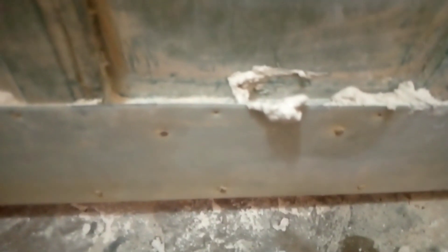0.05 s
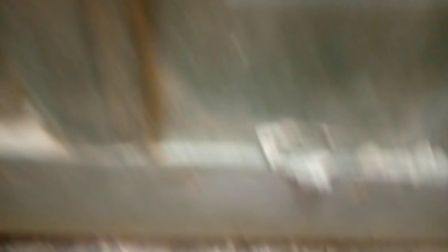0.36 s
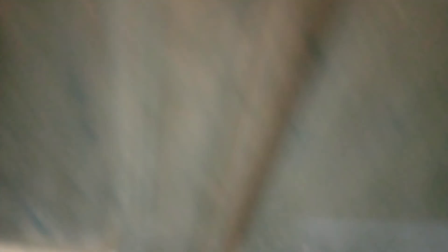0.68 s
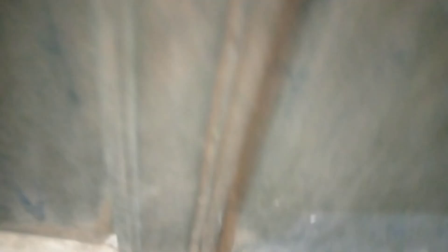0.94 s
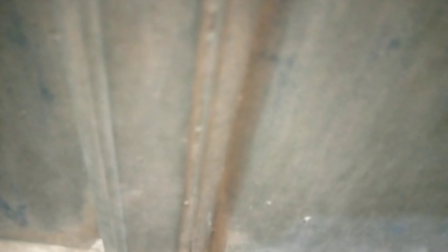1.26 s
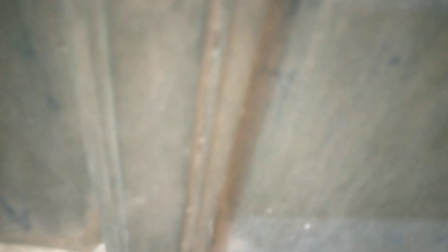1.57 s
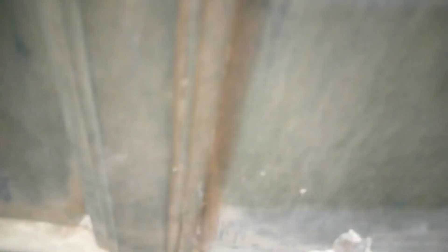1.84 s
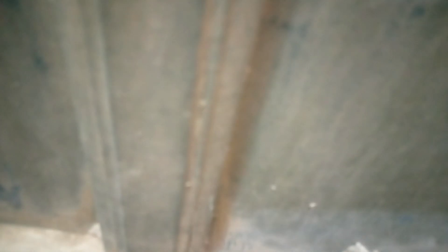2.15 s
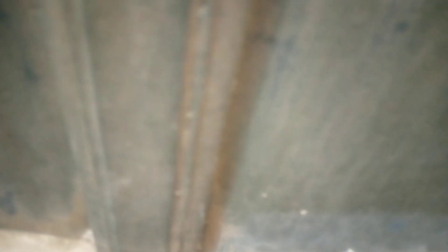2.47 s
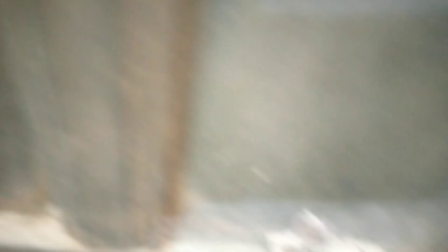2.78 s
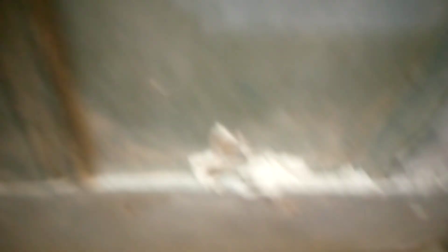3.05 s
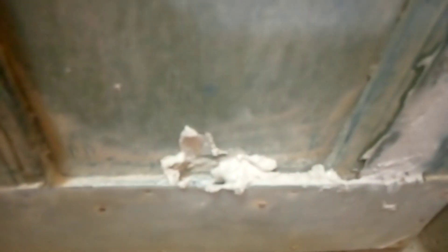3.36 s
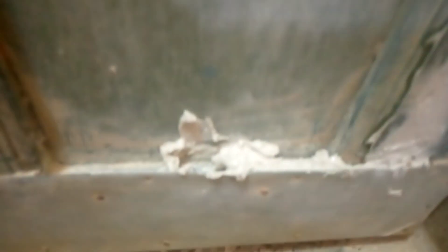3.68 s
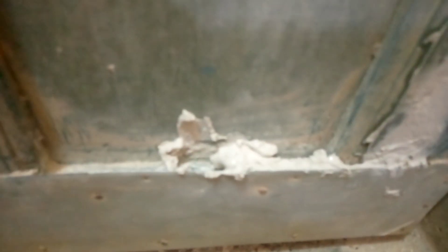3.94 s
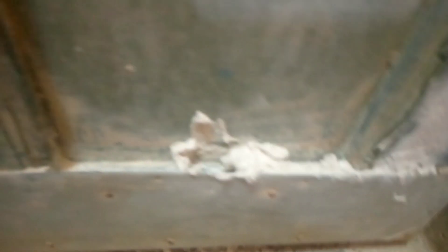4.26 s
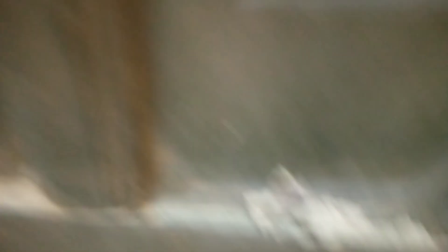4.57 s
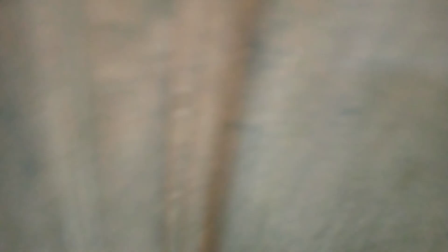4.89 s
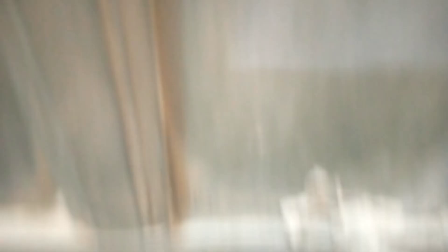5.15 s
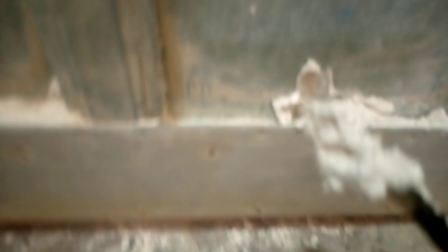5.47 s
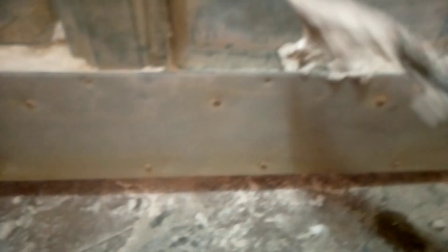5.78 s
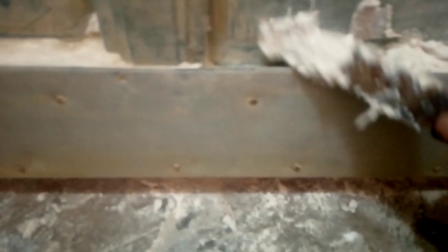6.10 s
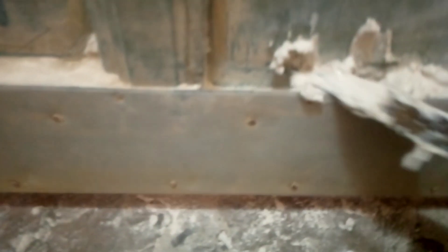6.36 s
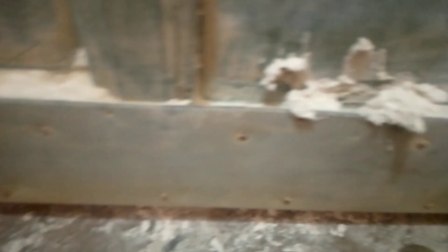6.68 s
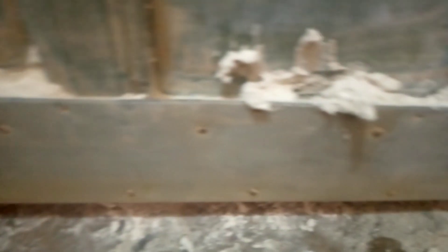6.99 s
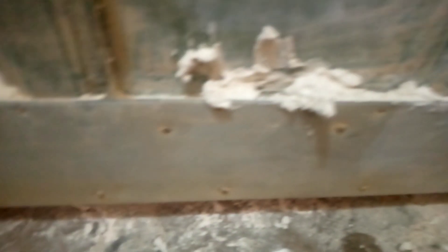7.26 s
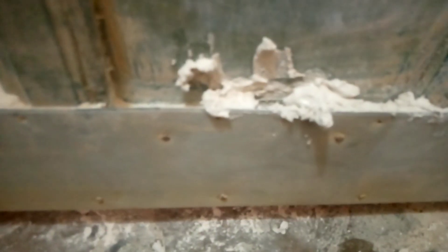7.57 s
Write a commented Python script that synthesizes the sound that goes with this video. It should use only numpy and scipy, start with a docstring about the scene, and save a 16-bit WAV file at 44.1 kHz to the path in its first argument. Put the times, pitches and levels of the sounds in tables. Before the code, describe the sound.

A putty knife knocks dully in a tub of crackling wet filler, then taps and scrapes it along a wooden door.

```python
"""A putty knife scoops wet filler from a tub and spreads it into the gap under a wooden door.
In the tub the blade knocks and scrapes dully while the paste tears and its air pockets crackle.
On the door it lands with a tap, then drags with a gritty hiss that swells until it lifts off;
the steel edge rasps and the panel booms. A bare room rings around it all, over a quiet hiss."""
import sys
import numpy as np
from scipy import signal
from scipy.fft import rfft, irfft
from scipy.io import wavfile
from scipy.ndimage import uniform_filter1d, map_coordinates

SR = 44100
rng = np.random.default_rng(int(sys.argv[2]) if len(sys.argv) > 2 else 0)


def persist_wave(psi):
    """Save psi, clipped to +-1, as 16-bit WAV."""
    counts = np.round(np.clip(psi, -1, 1) * 32767).astype(np.int16)
    wavfile.write(sys.argv[1], SR, np.atleast_2d(counts).T)


N = 336483
TIME = np.arange(N) / SR

# Levels in all tables are relative; each layer adds its own gain.
# pushes along the door: start_s, length_s, final_grit_db, swell_db, drag_db, boom_db
STROKES = [(1.223, 0.14, -82, -34.5, -63, -42), (1.389, 0.12, -51.5, 6, -45, -37.5),
           (1.478, 0.19, -51, -7, -46, -49.5), (2.034, 0.096, -40.5, 17.5, -74, -67),
           (2.464, 0.12, -66, -7.5, -53, -44), (2.588, 0.1, -30.5, 20, -46.5, -41.5),
           (6.145, 0.298, -59.5, -2.5, -59, -56.5), (6.422, 0.11, -44, 22.5, -40, -43),
           (6.525, 0.063, -34.5, 7.5, -47, -52), (6.63, 0.19, -87, -14, -55, -57)]
# hollow resonances of the tub: pitch_hz, width_hz, level_db
TUB_MODES = [(494, 36, -8), (847, 25.3, -7.5), (1085, 25, -9), (1189, 42, -5), (1434, 81, -0.5),
             (1510, 20, -8), (1836, 20, -6.5)]
# first reflections, at the tub and for paste and door: delay_ms, level_db
TUB_ECHOES = [(3.2, -6), (11.5, -10)]
NEAR_ECHOES = [(1.452, -17), (4.302, -16)]
# tone curves of crackling paste and of grit under steel: frequency_hz, level_db
CRACKLE_TONE = [(500, -15.5), (2800, -5), (4500, 2.5), (6500, 4.5), (10000, -4), (15000, -6.5)]
GRIT_TONE = [(200, -24), (600, 2), (950, 2.5), (1200, 3), (1500, 2.5), (2000, 1.5), (2600, 2.5),
             (3200, -1.5), (4400, 0), (5500, 3.5), (6700, 6.5), (9000, -4), (15000, -6.5)]


def tub_knocks(level_db, click_db, hardening_per_db, bass_hz):
    """Paste cushions each knock to a dull pulse, shorter and higher when hard; the steel adds a click."""
    # blade hits on the tub: start_s, peak_db, click_re_peak_db, bass_db
    hits = [(0.2157, -43, -23, 1), (0.2405, -29, -32, -1.5), (0.3836, -27, -39, -6.5),
            (0.3949, -16, -28, -8), (0.531, -8, -30, -6.5), (3.266, -39, -34, -2.5),
            (3.403, -40.5, -30, -0.5), (3.7908, -25.5, -30, -4.5), (4.057, -31.5, -36, -0.5),
            (4.4485, -17, -35, -3), (7.46, -39.5, -28, -24), (7.596, -35, -34, -21)]
    # tone curves of the cushioned knock and the steel click: frequency_hz, level_db
    knock_tone = [(50, -43.5), (100, -14.5), (180, -13), (280, -11), (480, 1), (780, -1), (1500, -2),
                  (2000, -14), (2800, -30.5), (3800, -57), (15000, -54.5)]
    click_tone = [(500, -31.5), (2800, -14.5), (5000, -3), (6700, 2), (10000, -1.5), (15000, 0.5)]
    times, peak_db, bright_db, _ = np.transpose(hits)
    knocks = through(clicks(times, peak_db + bright_db + click_db), pulse(click_tone))
    for start, db, _, bass_db in hits:
        stretch = np.exp(hardening_per_db * (db - peak_db.mean()))
        tone = [(hz * stretch, level + bass_db * (hz < bass_hz)) for hz, level in knock_tone]
        knocks += through(clicks([start], db + level_db), pulse(tone))
    # the wall bends, smearing each pulse over a few cycles without changing its tone
    smeared = knocks - 2 * resonate(knocks, hz=1386, width_hz=1000)
    return reflect(with_body(smeared, TUB_MODES), TUB_ECHOES, wander=0.08)


def tub_scrapes(level_db, split_hz):
    """The blade judders along the wall of the tub; a deeper scoop sounds fuller."""
    # scoops along the wall: start_s, length_s, level_db, bass_db
    scoops = [(0.537, 0.046, -42.5, -18), (3.371, 0.076, -41, -4), (3.464, 0.056, -41, 0.5),
              (3.789, 0.08, -38, -3), (3.871, 0.042, -35, -7), (4.058, 0.024, -40.5, -5.5),
              (4.13, 0.085, -49, 0), (4.219, 0.078, -46.5, 0), (7.178, 0.039, -57, -8),
              (7.212, 0.03, -50, -12), (7.268, 0.088, -48, -22), (7.454, 0.17, -40, 1)]
    # tone curve of the scrape: frequency_hz, level_db
    scrape_tone = [(80, -26), (280, -13.5), (490, -2.5), (700, -7), (1000, -4.5), (1450, -4.5),
                   (2000, -7.5), (3000, -22), (5000, -37), (15000, -40.5)]
    judder = grains(scrape_tone, per_s=760, spread_db=0, clump_db=2, clump_rate=58)
    low, high = (butterworth(judder, 3, split_hz, kind) for kind in ("low", "high"))
    scrapes = 0
    for start, length, db, bass_db in scoops:
        envelope = gesture(start, length, attack_s=0.0084, release_s=0.023, brush_db=-34)
        scrapes += from_db(level_db + db) * envelope * (high + from_db(bass_db) * low)
    in_tub = reflect(with_body(scrapes, TUB_MODES), TUB_ECHOES, wander=0.12)
    return mottle(in_tub, depth_db=3.5, per_s=18, width_hz=170)


def wet_paste(crackle_db, squelch_db, snap_db):
    """Paste tears off the blade, crackling harder as it stretches; the largest air pockets snap."""
    # paste tearing away: start_s, length_s, level_db
    tears = [(0.0, 0.083, -62.5), (0.474, 0.14, -58.5), (3.215, 0.055, -56), (3.322, 0.06, -55),
             (3.46, 0.067, -59.5), (3.784, 0.24, -61.5), (4.07, 0.347, -71), (4.628, 0.11, -58),
             (7.171, 0.18, -62), (7.46, 0.2, -54)]
    # large air pockets: start_s, peak_db
    big_pockets = [(0.029, -47), (0.068, -46.5), (0.3, -54.5), (2.46, -50.5), (3.231, -45.5),
                   (3.244, -42.5), (3.256, -41), (3.341, -41), (3.374, -46), (3.4942, -43.5), (3.53, -47.5),
                   (3.61, -45), (3.639, -52.5), (4.009, -41.5), (4.217, -48.5), (4.5311, -48), (7.303, -46),
                   (7.333, -45), (7.445, -43.5), (7.464, -40), (7.557, -33)]
    # bright resonances of the loaded blade: pitch_hz, width_hz, level_db
    steel_modes = [(4650, 87, -2.5), (6530, 410, -6.5), (11400, 800, -1)]
    shape = dict(attack_s=0.027, release_s=0.014, brush_db=-15, swell_db=1.5)
    tearing = sum(from_db(db) * gesture(start, length, **shape) for start, length, db in tears)
    crackle = grains(CRACKLE_TONE, per_s=950, spread_db=3.5, clump_db=4.5, clump_rate=55)
    pops = squelch(per_s=370, spread_db=5, low_hz=5485, high_hz=15500, width_hz=170)
    times, peak_db = np.transpose(big_pockets)
    snaps = burst(clicks(times, peak_db + snap_db), decay_s=0.0034) * toned_noise(CRACKLE_TONE)
    paste = tearing * (from_db(crackle_db) * crackle + from_db(squelch_db) * pops) + snaps
    on_blade = reflect(with_body(paste, steel_modes), NEAR_ECHOES, wander=0.091)
    return mottle(on_blade, depth_db=3.5, per_s=25, width_hz=700)


def squelch(per_s, spread_db, low_hz, high_hz, width_hz, pitches=12):
    """Tiny air pockets burst in the paste, each ringing at one of several high pitches; rms 1."""
    out = 0
    for hz in np.geomspace(low_hz, high_hz, pitches):
        waits, sizes = rng.exponential(1, size=(400, 2)).T
        times = np.cumsum(waits) * pitches / per_s
        heard = times < TIME[-1]
        pops = clicks(times[heard], spread_db * np.minimum(sizes[heard], 3))
        out += resonate(pops, hz, width_hz) * low_hz / hz
    return rms_one(out)


def door_taps(level_db, steel_from_hz, crunch_db):
    """The flat blade slaps the wood: broad, quickly damped resonances and a short crunch of grit."""
    # blade landings: start_s, peak_db, steel_re_peak_db, grit_re_peak_db, thud_re_peak_db
    landings = [(1.2228, -22, -3, -2, -18), (2.0062, -23.5, -24, 4, 1), (6.172, -30, -4.5, 0, 2)]
    # resonances of door and blade: pitch_hz, width_hz, level_db
    tap_modes = [(355.5, 39, 11.5), (814, 56, 6), (1390, 300, 3), (1970, 770, 2), (2620, 340, 11.5),
                 (3400, 1000, -4), (4500, 510, -4)]
    times, peak_db, steel_db, grit_db, thud_db = np.transpose(landings)
    wood = ring(clicks(times, peak_db), [m for m in tap_modes if m[0] < steel_from_hz])
    steel = ring(clicks(times, peak_db + steel_db), [m for m in tap_modes if m[0] >= steel_from_hz])
    thud = resonate(clicks(times, peak_db + thud_db), hz=199.4, width_hz=19.6)
    grit = grains(GRIT_TONE, per_s=20000, spread_db=11, clump_db=1, clump_rate=60)
    envelope = burst(clicks(times, peak_db + grit_db), decay_s=0.0045)
    crunch = butterworth(envelope * grit, order=2, hz=4470)
    return reflect(from_db(level_db) * (wood + steel + thud) + from_db(crunch_db) * crunch, NEAR_ECHOES)


def door_strokes(drag_db, grit_db):
    """Paste drags on the wood and wakes the panel while its grit hisses under the steel edge."""
    # tone curve of paste dragging on wood: frequency_hz, level_db
    drag_tone = [(60, -17.5), (170, -16.5), (240, -13.5), (345, 3.5), (430, -0.5), (540, -1), (700, -8.5),
                 (1400, -12.5), (3500, -17.5), (15000, -30.5)]
    # resonances of the door panel: pitch_hz, width_hz, level_db
    panel_modes = [(227, 10.3, 13), (1010, 48, -3.5)]
    shape = dict(attack_s=0.021, release_s=0.0054, brush_db=-20)
    speed = pressure = 0
    for start, length, hiss_db, swell_db, push_db, _ in STROKES:
        speed += from_db(hiss_db) * gesture(start, length, swell_db=swell_db, **shape)
        # pressure swells less and eases early, as the blade tilts to lift
        pressure += from_db(push_db) * gesture(start, 0.88 * length, swell_db=0.39 * swell_db, **shape)
    slips = grains(drag_tone, per_s=3600, spread_db=5, clump_db=3, clump_rate=100)
    drag = rms_one(with_body(slips, panel_modes))
    grit = grains(GRIT_TONE, per_s=8800, spread_db=2, clump_db=1.5, clump_rate=110)
    rubbing = from_db(drag_db) * pressure * drag + from_db(grit_db) * speed * grit
    return reflect(rubbing, NEAR_ECHOES, wander=0.0994)


def edge_rasps(width_hz, sag_per_s, stick_db, stick_rate):
    """Friction shakes a resonance of the steel edge in sticky pulses; it sags as paste loads the blade."""
    # rasping notes: start_s, length_s, pitch_hz, level_db
    rasps = [(1.408, 0.089, 2680, -57), (6.2, 0.26, 2620, -65), (6.5, 0.022, 1476, -49),
             (6.549, 0.026, 1935, -42.5), (6.676, 0.17, 1316, -63.5), (7.463, 0.064, 4670, -56.5),
             (7.542, 0.12, 1415, -51)]
    friction = butterworth(rng.standard_normal((2, N)), order=2, hz=width_hz / 2)
    shaking = rms_one(friction * from_db(stick_db * drift(stick_rate)))
    out = np.zeros(N)
    for start, length, hz, db in rasps:
        near = np.abs(TIME - start - length / 2) < length / 2 + 0.1
        pitch_hz = hz * np.exp(-sag_per_s * (TIME[near] - start))
        phase = 2 * np.pi * np.cumsum(pitch_hz) / SR
        note = shaking[0, near] * np.cos(phase) + shaking[1, near] * np.sin(phase)
        envelope = gesture(start, length, attack_s=0.0062, release_s=0.0043, brush_db=-13)
        out[near] += from_db(db) * envelope[near] * note
    return out


def lift_offs(level_db, decay_s):
    """The bent blade springs off the wood with a last spit of grit."""
    # the blade flicking free: start_s, level_db
    flicks = [(2.133, -37), (2.684, -35.5), (6.586, -21)]
    times, flick_db = np.transpose(flicks)
    return burst(clicks(times, flick_db + level_db), decay_s) * toned_noise(CRACKLE_TONE)


def door_boom(level_db, rest_db, waver_db, hz, width_hz):
    """The panel's lowest mode hums faintly and unevenly throughout and booms under each push."""
    hum = narrow_band(rng.standard_normal(N), hz, width_hz)
    running_rms = np.sqrt(np.abs(uniform_filter1d(hum ** 2, size=6000)) + 1e-20)
    shape = dict(attack_s=0.063, release_s=0.1, brush_db=-19.5)
    pushes = [from_db(db) * gesture(start, length, **shape) for start, length, *_, db in STROKES]
    resting = from_db(rest_db + waver_db * drift(4.5))
    return (resting + from_db(level_db) * np.max(pushes, axis=0)) * hum / running_rms


def bare_room(build_s, modes_db, first_per_s, crowding_s, bands=11):
    """Impulse response: early reflections crowd into a dense tail over a few low standing waves."""
    # reverb tail by band: frequency_hz, t60_s, level_db
    decay_curve = [(97, 1.2, 11), (275.3, 0.65, 10), (726, 0.68, 1.5), (1470, 0.53, 0), (2840, 0.68, 0),
                   (6700, 0.55, -2.5), (14500, 0.29, 1)]
    # standing waves: pitch_hz, t60_s, level_db
    room_modes = [(125, 1.1, -3), (170.8, 1.36, 1.5), (315.6, 1.4, -13.5)]
    t = TIME[:2 * SR]
    density = np.clip(first_per_s * (1 + (t / crowding_s) ** 2) / SR, 1e-4, 1)
    arrivals = rng.standard_normal(len(t)) * (rng.random(len(t)) < density) / np.sqrt(density)
    edges_hz = np.geomspace(70, 17000, bands + 1)
    tail = 0
    for low, high in zip(edges_hz, edges_hz[1:]):
        # filtering both ways keeps the bands aligned in time
        backward = butterworth(arrivals[::-1], 2, [low, high], "band")
        band = butterworth(backward[::-1], 2, [low, high], "band")
        t60, db = (at_hz(np.array(decay_curve)[:, [0, k]], np.sqrt(low * high)) for k in (1, 2))
        tail += from_db(db) * band * from_db(-60 * t / t60)
    tail *= 1 - np.exp(-t / build_s)
    tail /= np.sqrt(np.sum(tail ** 2))
    for hz, t60, db in room_modes:
        tail += from_db(db + modes_db) * np.sin(2 * np.pi * hz * t) * from_db(-60 * t / t60)
    return tail


def room_tone(hiss_db, width_hz):
    """A quiet, mottled hiss; a faint hollow noise swells now and then, each time at another pitch."""
    # tone curve of the hiss: frequency_hz, level_db
    hiss_tone = [(20, -2), (55, 7.5), (130, 7.5), (230, 2), (450, 2.5), (750, -10.5), (1200, -6),
                 (2800, -11.5), (4500, -10.5), (6300, -7.5), (15000, -18)]
    # hollow swells: start_s, length_s, pitch_hz, level_db
    hollows = [(0.082, 0.16, 600, -71), (5.456, 0.16, 460, -69), (6.063, 0.12, 378, -69),
               (6.959, 0.13, 614, -73)]
    bed = from_db(hiss_db) * toned_noise(hiss_tone)
    noise = rng.standard_normal(N)
    for start, length, hz, db in hollows:
        envelope = gesture(start, length, attack_s=0.017, release_s=0.031, brush_db=-22)
        bed += from_db(db) * envelope * rms_one(narrow_band(noise, hz, width_hz))
    return mottle(bed, depth_db=4, per_s=12, width_hz=100)


def gesture(start, length, attack_s, release_s, brush_db, swell_db=0):
    """Envelope of one movement: it brushes, bites, swells or fades to gain 1 at its end and dies away."""
    brush_s, ease_share = 0.072, 0.085  # a longer movement sets in more slowly, by this share of it
    coarse = TIME[::64]
    t = coarse - start
    brush = from_db(brush_db) * np.exp(np.clip(t / brush_s, -20, 0))
    bite = np.clip(t / (attack_s + ease_share * length), 0, 1)
    swell = from_db(swell_db * (np.clip(t / length, 0, 1) - 1))
    release = np.exp(-np.clip((t - length) / release_s, 0, 20))
    return np.interp(TIME, coarse, np.maximum(bite, brush) * swell * release)


def grains(tone, per_s, spread_db, clump_db, clump_rate):
    """Friction texture: tiny slips of uneven size that come in clumps; rms 1."""
    sizes = from_db(spread_db * np.minimum(rng.exponential(1, N), 4)) * rng.choice([-1, 1], N)
    slips = sizes * (rng.random(N) < per_s / SR) * from_db(clump_db * drift(clump_rate))
    return rms_one(through(slips, pulse(tone)))


def reflect(x, echoes, wander=0, wander_rate=8):
    """Near reflections comb the spectrum; with wander, the comb slides as the hand moves."""
    out = x
    for ms, db in echoes:
        delay_s = ms / 1000 * np.exp(wander * drift(wander_rate))
        out = out + from_db(db) * map_coordinates(x, [(TIME - delay_s) * SR], order=3)
    return out


def mottle(x, depth_db, per_s, width_hz):
    """Narrow regions of the spectrum swell and fade at random; the mean level stays."""
    hz, times, spectrum = signal.stft(x, SR, nperseg=1024)
    grid = np.meshgrid(hz / width_hz, times * per_s, indexing="ij")
    patches = rms_one(map_coordinates(rng.standard_normal((256, 256)), grid, order=1, mode="wrap"))
    return signal.istft(spectrum * rms_one(from_db(depth_db * patches)), SR)[1][:N]


def resonate(x, hz, width_hz):
    """A resonance of gain 1 at its centre."""
    r = np.exp(-np.pi * width_hz / SR)
    feedback = [1, -2 * r * np.cos(2 * np.pi * hz / SR), r * r]
    return signal.lfilter(np.array([1, 0, -1]) * (1 - r * r) / 2, feedback, x + 1e-18)


def narrow_band(x, hz, width_hz):
    """The same resonance twice, for steeper skirts."""
    return resonate(resonate(x, hz, width_hz), hz, width_hz)


def ring(x, modes):
    """Parallel resonances of one body, alternating in polarity."""
    return sum((-1) ** k * from_db(db) * resonate(x, hz, width)
               for k, (hz, width, db) in enumerate(modes))


def with_body(x, modes):
    """A contact sound plus the resonances it wakes."""
    return x + sum(from_db(db) * resonate(x, hz, width) for hz, width, db in modes)


def clicks(times, levels_db):
    """One click for each event."""
    out = np.zeros(N)
    out[np.round(np.asarray(times) * SR).astype(int)] = from_db(levels_db)
    return out


def burst(x, decay_s):
    """Each click opens an envelope that dies away."""
    return signal.lfilter([1], [1, -np.exp(-1 / (decay_s * SR))], x + 1e-18)


def pulse(tone, size=4096):
    """The tightest (minimum-phase) pulse with a given tone curve; peak 1."""
    gains = from_db(at_hz(tone, np.arange(size // 2 + 1) * SR / size))
    cepstrum = irfft(np.log(gains))
    cepstrum[1:size // 2] *= 2
    cepstrum[size // 2 + 1:] = 0
    shape = irfft(np.exp(rfft(cepstrum)))
    return shape / np.abs(shape).max()


def toned_noise(tone):
    """Steady noise with a given tone curve; rms 1."""
    return rms_one(through(rng.standard_normal(N), pulse(tone)))


def drift(rate):
    """A random wander with `rate` turning points a second; rms 1."""
    knots = rng.standard_normal(int(N / SR * rate) + 2)
    return rms_one(np.interp(TIME * rate, np.arange(len(knots)), knots))


def butterworth(x, order, hz, kind="low"):
    """A smooth low-, high- or band-pass."""
    return signal.sosfilt(signal.butter(order, hz, kind, fs=SR, output="sos"), x)


def through(x, response):
    """Pass a signal through an impulse response."""
    return signal.oaconvolve(x, response)[:N]


def at_hz(curve, hz):
    """Read a curve along a log-frequency axis."""
    knots_hz, values = np.transpose(curve)
    return np.interp(np.log(np.maximum(hz, 1)), np.log(knots_hz), values)


def from_db(db):
    """Decibels to gain."""
    return 10 ** (np.asarray(db) / 20)


def rms_one(x):
    """Scale to rms 1."""
    return x / np.sqrt(np.mean(x ** 2) + 1e-20)


def scene():
    """Mono mix; the tub stands farther off than the door, so it sends more to the room."""
    knocks = tub_knocks(level_db=1.5, click_db=13.5, hardening_per_db=0.0073, bass_hz=600)
    scrapes = tub_scrapes(level_db=-7.5, split_hz=1100)
    paste = wet_paste(crackle_db=0.5, squelch_db=-5, snap_db=-2)
    taps = door_taps(level_db=19.5, steel_from_hz=1800, crunch_db=-5.5)
    strokes = door_strokes(drag_db=-6, grit_db=0.5)
    strokes += edge_rasps(width_hz=560, sag_per_s=0.23, stick_db=2, stick_rate=55)
    strokes += lift_offs(level_db=-0.5, decay_s=0.0036)
    tub_send = from_db(-4) * knocks + from_db(-6) * scrapes + from_db(-1) * paste
    door_send = from_db(-7) * taps + from_db(-8.5) * strokes
    reverb = sum(through(send, bare_room(build_s=0.0028, modes_db=-38.5, first_per_s=900, crowding_s=0.03))
                 for send in (tub_send, door_send))
    boom = door_boom(level_db=-9.5, rest_db=-66, waver_db=3, hz=87.1, width_hz=18)
    bed = room_tone(hiss_db=-71.5, width_hz=150)
    return (knocks + scrapes + paste + taps + strokes + reverb + boom + bed)[None]


def record(dry):
    """The microphone has a scooped top octave and a peak above it; the very top is cut."""
    # tone curve of the microphone: frequency_hz, level_db
    microphone_tone = [(20, -8.5), (60, 0), (7000, -2), (8300, -12), (13000, -12), (14800, 0), (16000, 0)]
    cutoff_hz = 16000
    response = pulse(microphone_tone)
    coloured = through(dry[0], response / np.abs(rfft(response)).max())
    return signal.sosfilt(signal.ellip(10, 0.3, 70, cutoff_hz, fs=SR, output="sos"), coloured)[None]


dry = scene()
out = record(dry)
persist_wave(out)
```